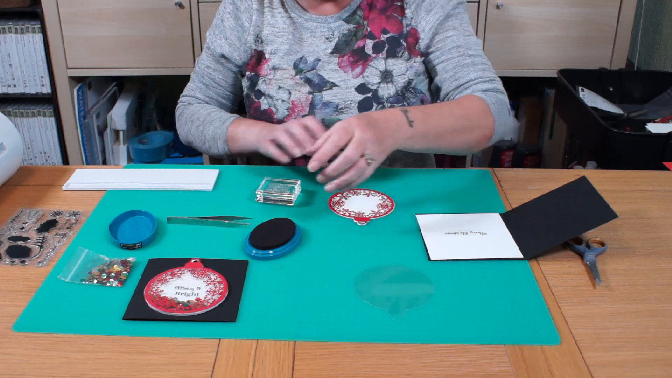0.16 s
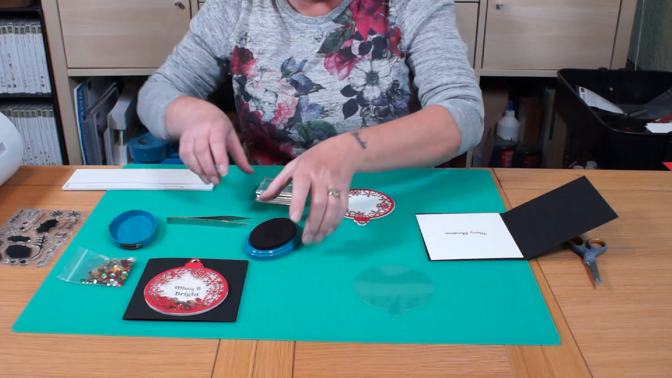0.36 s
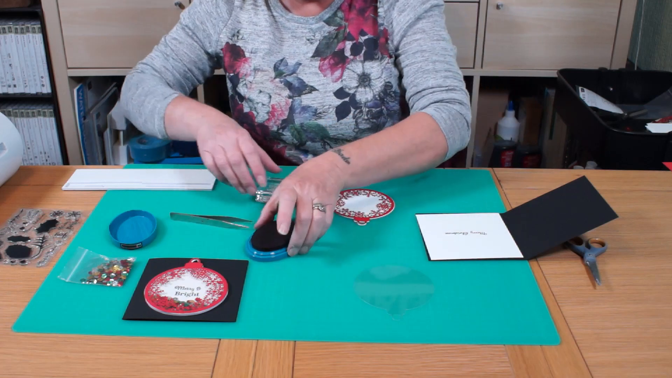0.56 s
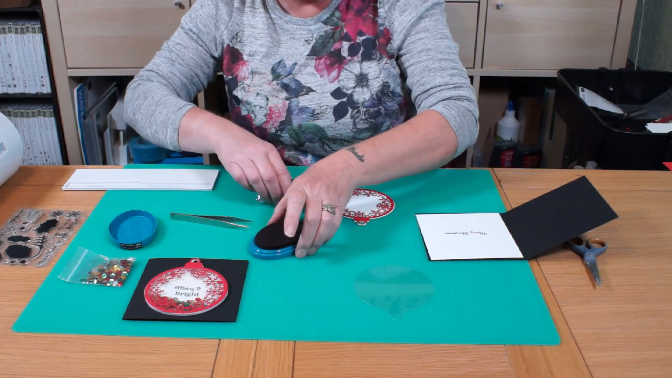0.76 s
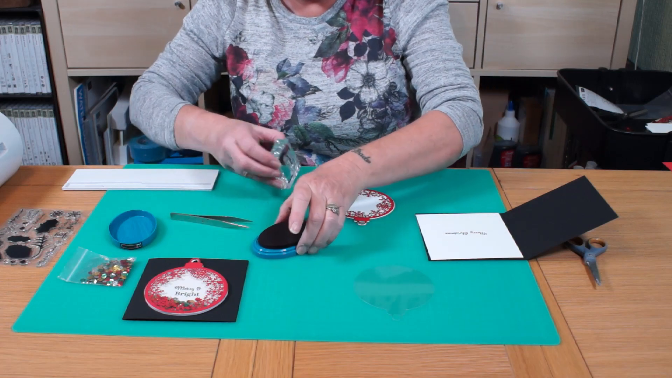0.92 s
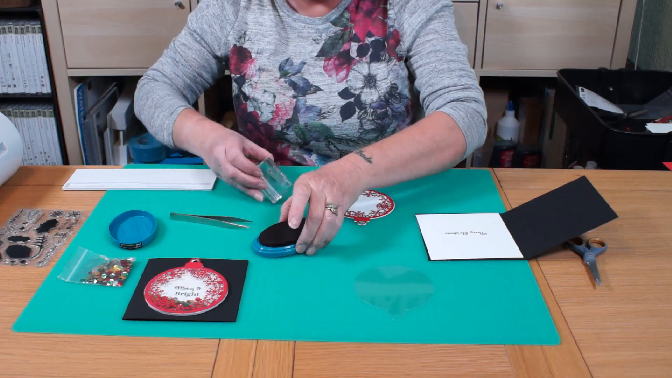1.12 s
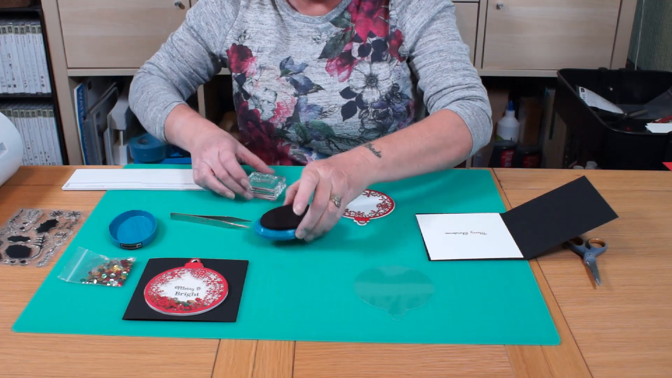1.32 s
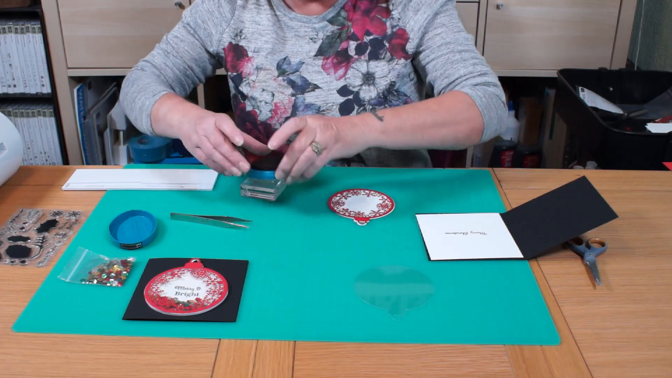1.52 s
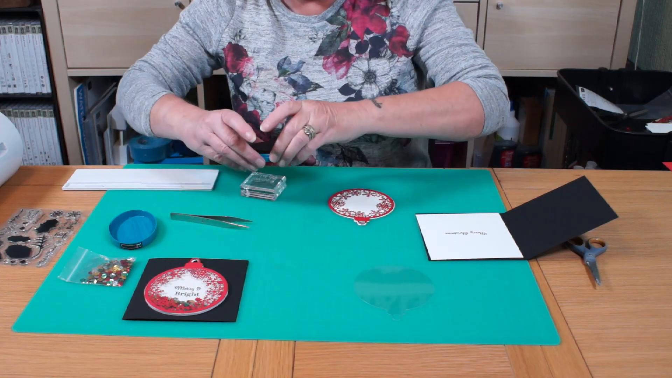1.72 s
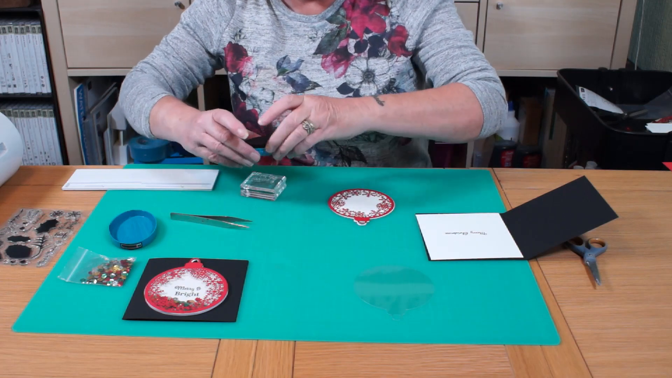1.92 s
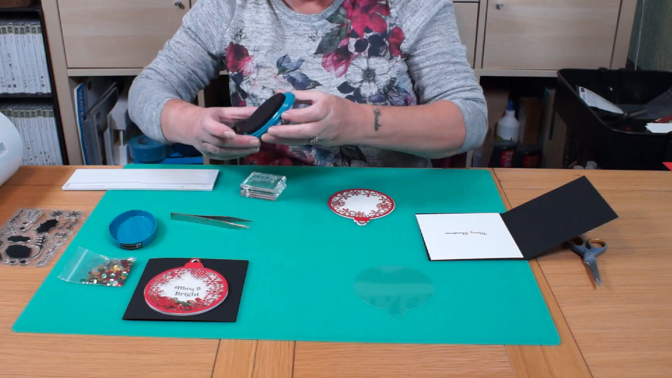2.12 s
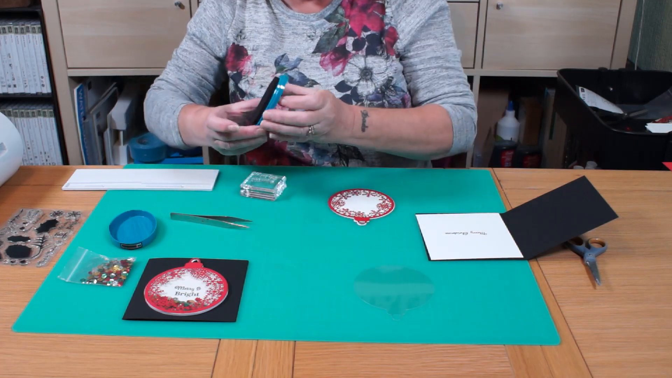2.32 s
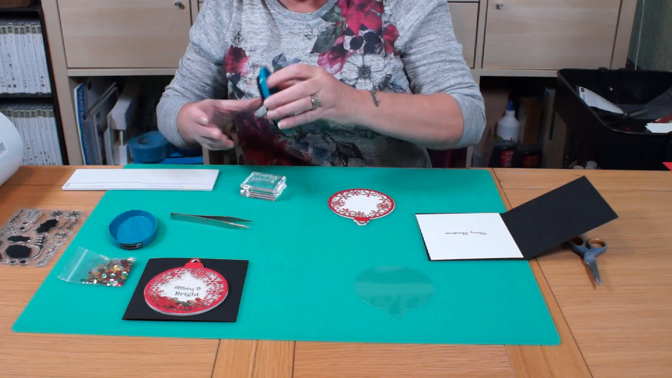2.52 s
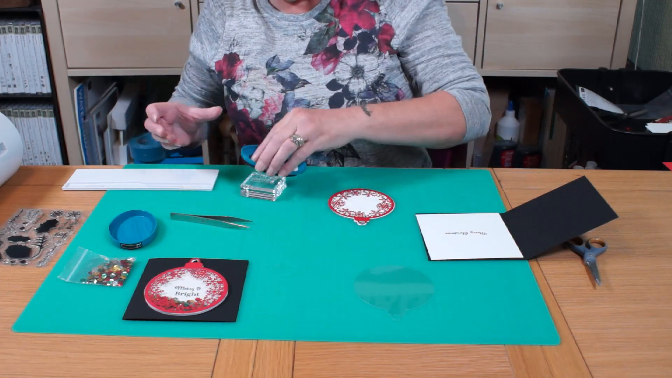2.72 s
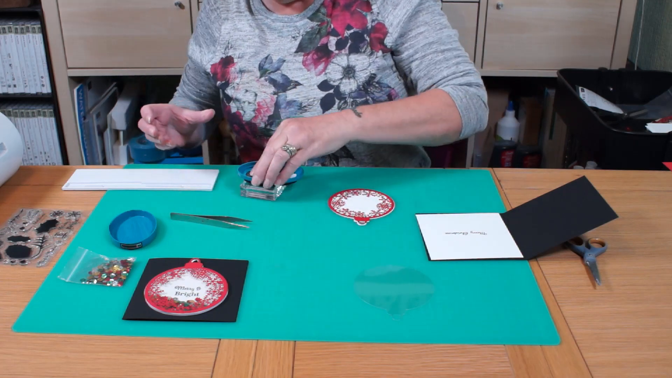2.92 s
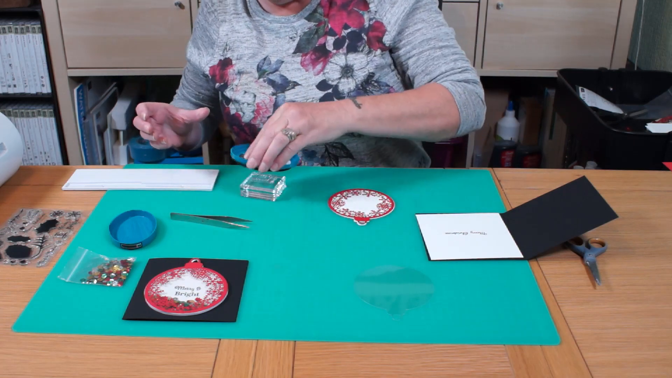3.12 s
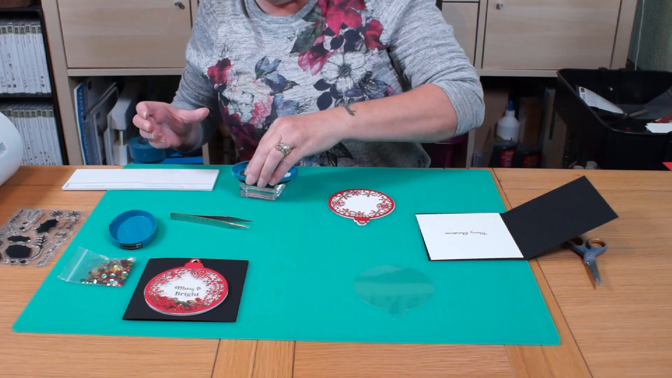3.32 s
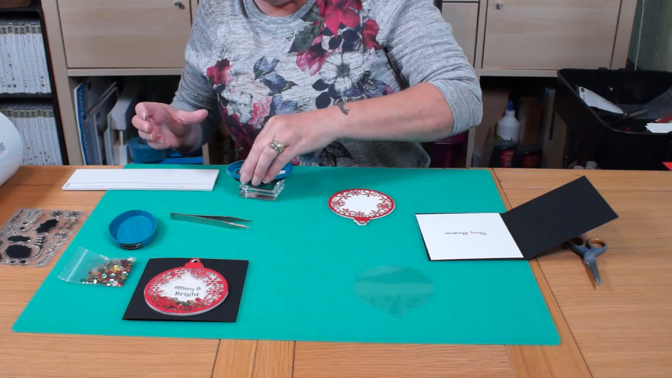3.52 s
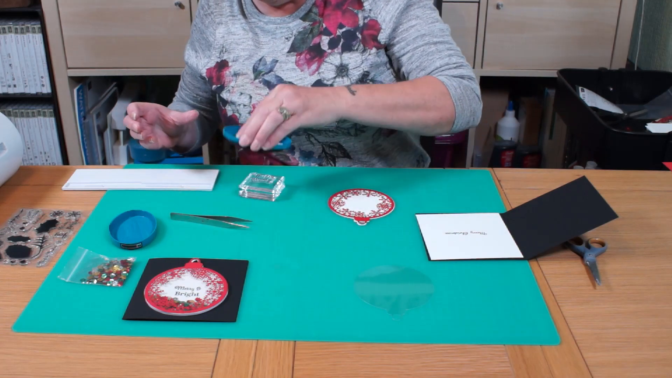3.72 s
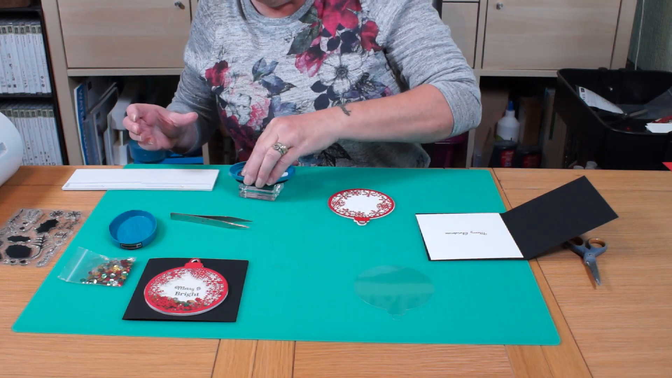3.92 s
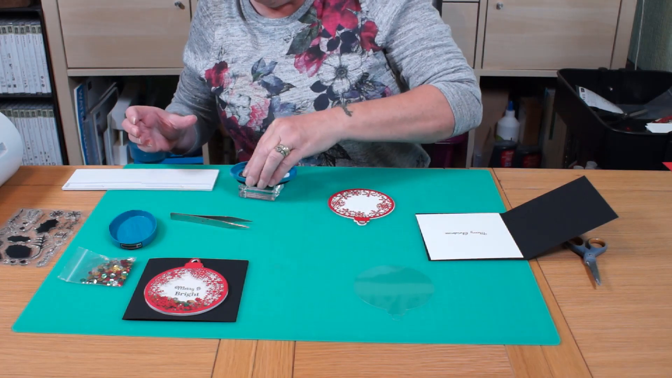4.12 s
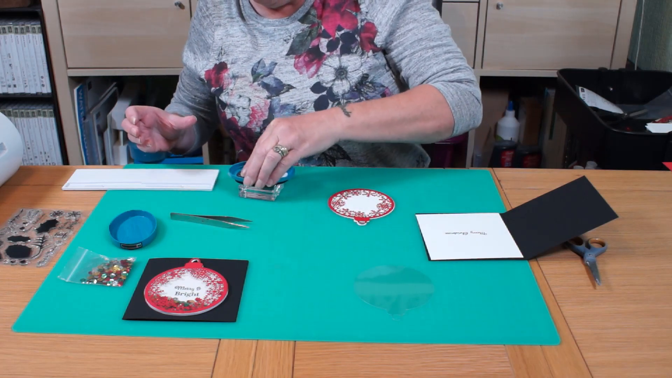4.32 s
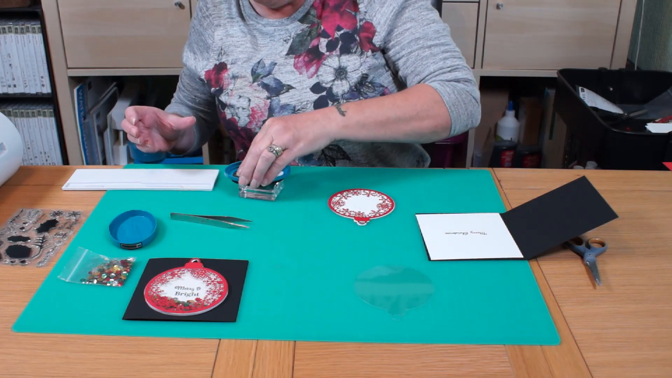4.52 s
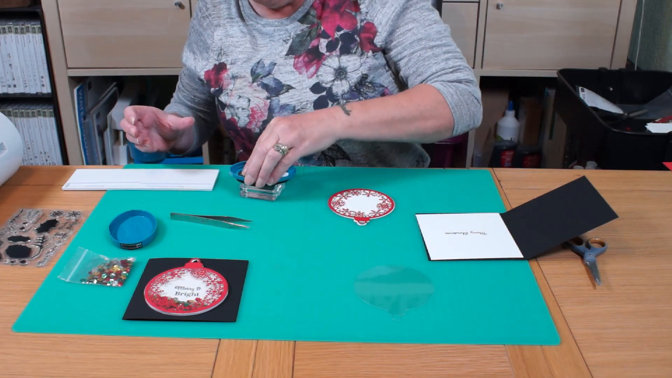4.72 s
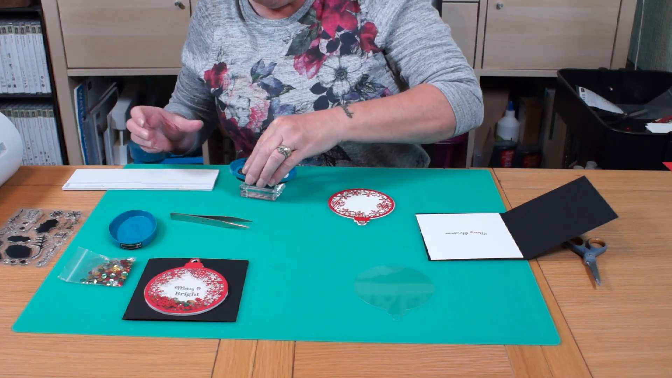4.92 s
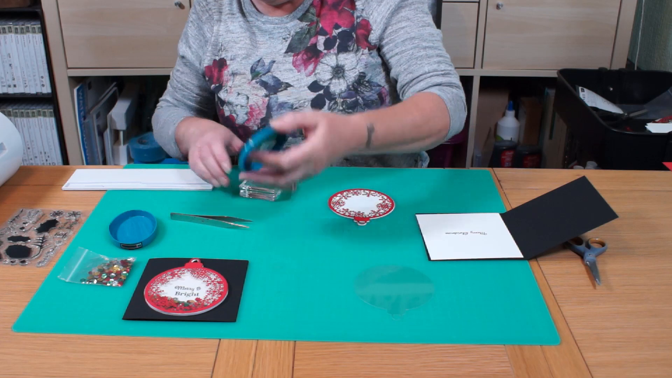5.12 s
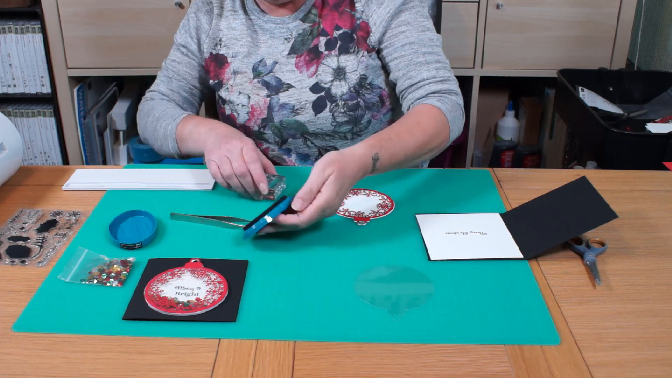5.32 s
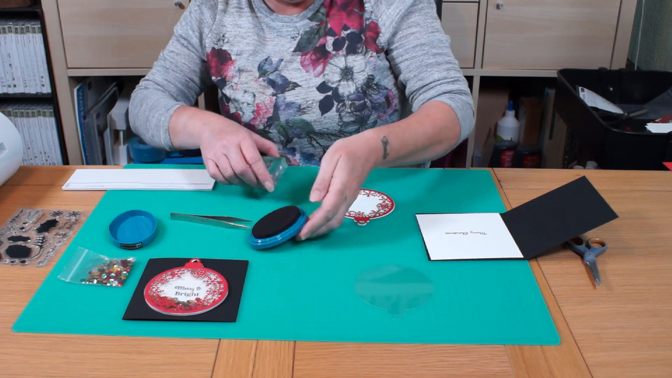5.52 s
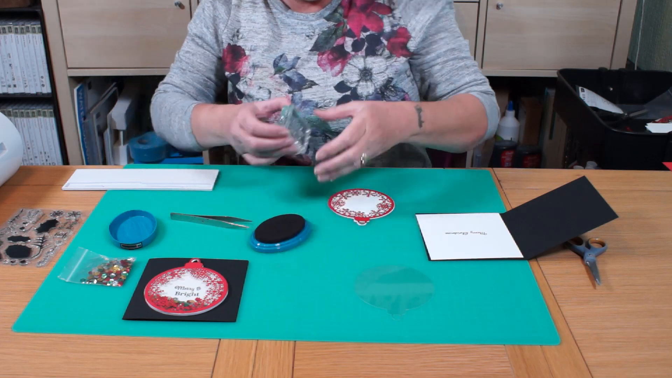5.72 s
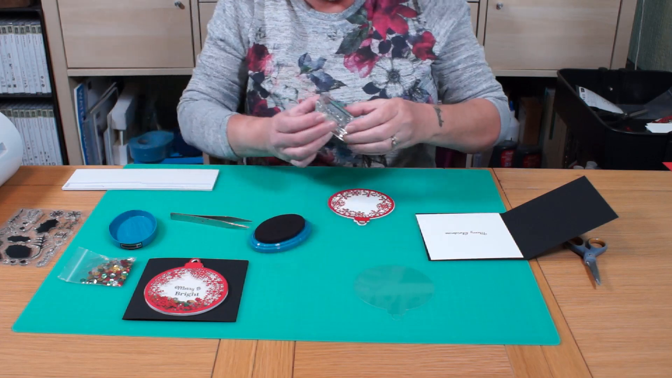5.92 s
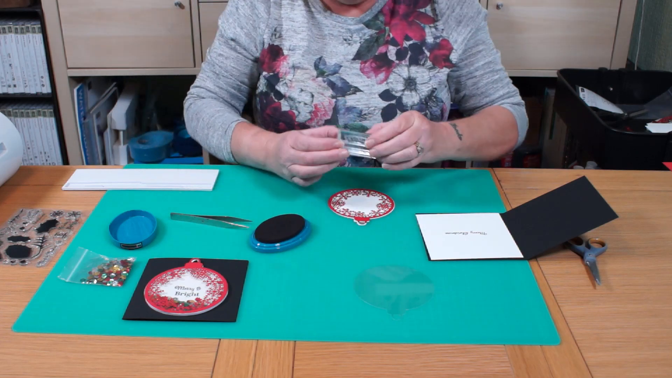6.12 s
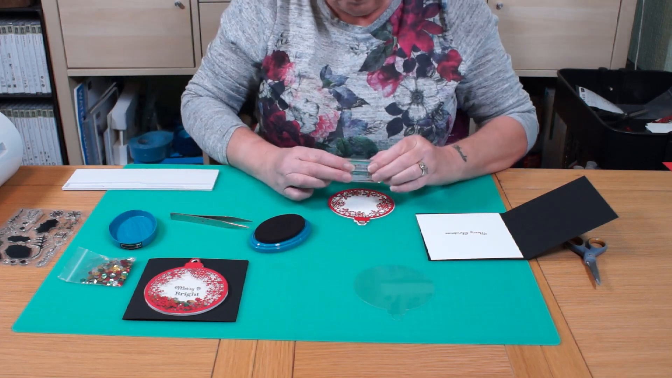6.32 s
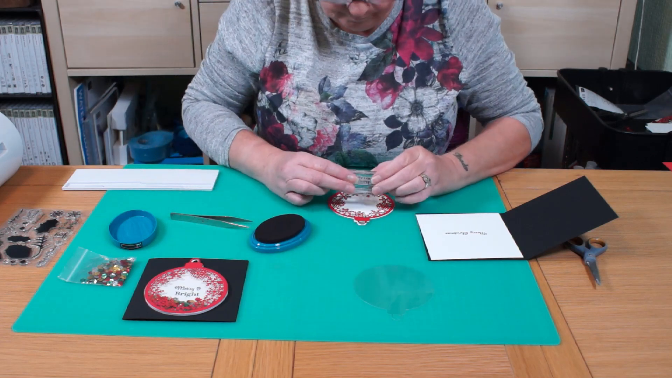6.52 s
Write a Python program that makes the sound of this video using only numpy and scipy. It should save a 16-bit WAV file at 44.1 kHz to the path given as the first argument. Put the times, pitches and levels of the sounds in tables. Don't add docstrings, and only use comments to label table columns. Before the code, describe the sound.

A small, fairly dry room with soft wide hiss and a barely audible appliance hum. Tiny scuffs brush the mat at the start. Around 0.56 s a slight touch leads into a sharp plastic clack at 0.65, then a weak bump at 0.77 and scuffing. Firm knocks land at 1.14 and 1.33, with a lighter bounce between, ringing briefly through the wooden table. Near quiet follows, with very faint rubs around 2.2-2.5. Felt-softened taps begin dull at 2.9, stronger at 3.28, soft at 3.52 and 3.92, strong at 4.16, then continue about every 0.2 s at 4.34, 4.54, 4.76 and 4.92, each a short woody thud with a faint lift-off. Scuffs and two bright clacks come at 5.33-5.47, then a hollow plastic rocking clatter at 5.68-5.74. A faint low thump at about 5.98 and a slight brush leave only hiss until 6.5.

```python
import sys
import numpy as np
from scipy import signal
from scipy.io import wavfile
from scipy.ndimage import uniform_filter1d

SR = 44100
rng = np.random.default_rng(int(sys.argv[2]) if len(sys.argv) > 2 else 0)


def convert_level_to_amplitude(level_db):
    exponent = np.asarray(level_db, float) / 20
    return 10 ** exponent


def store_pcm(level_fs):
    pcm = np.round(np.clip(level_fs, -1, 1) * 32767).astype(np.int16)
    wavfile.write(sys.argv[1], SR, np.atleast_2d(pcm).T)


N = 289188

# frequency in Hz, density in dB per Hz.
HISS_COLOUR = [(15, -51), (25, -32), (77, -8), (254, -0.5), (1140, -2.5), (6440, -14.5), (11000, -20),
               (14300, -104)]
# frequency in Hz, left-right likeness from -1 to 1.
HISS_LIKENESS = [(60, 1), (130, 0.56), (270, -0.083), (560, -0.68), (1180, -0.54), (2490, -0.29),
                 (5250, 0.0057), (11100, 0.26)]
# time in seconds, level in dB.
HISS_DRIFT = [(0.0, -60.5), (2.6, -63), (3.4, -62), (6.56, -61)]
# centre in Hz, width in Hz, boost in dB.
AIR_BOOMS = [(97.8, 11.4, 6), (250, 45, 2), (600, 140, 3), (850, 30, 3)]
# frequency in Hz, level in dB.
APPLIANCE_HUMS = [(99, -77.5), (880, -79)]
# start in seconds, level in dB, centre in Hz,
# width in Hz, length in seconds.
SCUFFS = [(0.008, -53, 865, 2320, 0.032), (0.603, -51, 1750, 2570, 0.068), (0.783, -61, 1810, 2500, 0.046),
          (0.868, -55.5, 1030, 2400, 0.049), (2.231, -69, 1500, 2000, 0.047),
          (2.462, -71, 2500, 4000, 0.045), (2.993, -68, 3800, 6000, 0.063), (5.326, -58, 2040, 2920, 0.048),
          (5.382, -58.5, 1350, 900, 0.033), (5.607, -59, 1970, 200, 0.051), (5.644, -54, 1900, 300, 0.022),
          (5.64, -60, 3530, 1200, 0.035), (0.017, -56, 445, 293, 0.023), (0.886, -57.5, 600, 900, 0.041),
          (6.014, -67.5, 3340, 3920, 0.059)]
# start in seconds, blow in dB, table thud in dB re blow, body pitch in Hz,
# edge tick in dB re blow.
KNOCKS = [(0.561, -50.5, 12.5, 2000, 14), (0.646, -11.5, -45, 1820, -3.5), (0.765, -41.5, 2.5, 990, 2),
          (1.1408, -13.5, -4, 1075, -5), (1.184, -29, -3, 1220, 4.5), (1.334, -15.5, -5.5, 1830, -7),
          (5.4169, -14, -5.5, 1770, 7), (5.467, -20.5, -7, 1600, 7), (5.68, -20.5, -11.5, 1430, 1),
          (5.719, -28.5, -35, 1210, 4.5), (5.735, -28.5, -8, 1240, -2)]
# start in seconds, level in dB, pitch in Hz, 60 dB decay in seconds.
KNOCK_RINGS = [(0.648, -39.5, 392, 0.16), (0.648, -47, 4130, 0.12), (1.144, -33.5, 515, 0.13),
               (1.143, -31, 1220, 0.069), (1.143, -25, 2260, 0.014), (1.336, -39, 2290, 0.04),
               (1.336, -42, 1880, 0.051), (0.648, -38, 794, 0.069), (0.649, -37.5, 1140, 0.08),
               (5.47, -29.5, 1447, 0.06), (5.418, -29, 2700, 0.028), (5.418, -27, 1604, 0.046),
               (5.417, -35, 480, 0.045), (5.418, -23, 587, 0.036)]
# start in seconds, level in dB.
CASE_ROCKS = [
    (5.682, -23.5),
    (5.72, -30),
    (5.738, -28.5),
]
# start in seconds, blow in dB, table thud in dB re blow, edge tick in dB re
# blow, later table swell in dB re table thud.
TAPS = [
    (2.905, -25.5, -2, -40, -16.5),
    (3.277, -16.5, -3.5, -7.5, -16),
    (3.516, -26.5, 4, -4.5, -15.5),
    (3.919, -26, 1.5, -3, -12.5),
    (4.16, -16.5, 0, -7, -15),
    (4.344, -22.5, -1.5, -13.5, -19.5),
    (4.538, -29.5, 5.5, -3.5, -16.5),
    (4.755, -20, -0.5, -7, -17),
    (4.9164, -23, -1.5, -13.5, -19),
]
# frequency in Hz, level in dB, 60 dB decay in seconds.
CASE_MODES = [(870, -0.5, 0.086), (995, 2.5, 0.069), (1155, 5.5, 0.078), (1289, 4, 0.11), (1570, -2, 0.05),
              (1830, -5, 0.06), (2000, -5, 0.068), (2253, 5.5, 0.043), (2440, -2, 0.06),
              (2630, -1.5, 0.056)]
# frequency in Hz, level in dB, 60 dB decay in seconds.
FRAME_MODES = [(102.4, -12, 0.29), (133, -8.5, 0.17), (161, -4, 0.16), (179.2, -7, 0.29)]
# frequency in Hz, level in dB, 60 dB decay in seconds.
TOP_MODES = [(200, -9, 0.3), (224.1, -1, 0.23), (261.7, -8, 0.33), (305.7, 9, 0.11), (339.6, 6.5, 0.18),
             (364, -8, 0.34), (441.4, 0, 0.16), (480, 0, 0.17), (526.7, -1, 0.16), (564.6, -1.5, 0.16),
             (610, -0.5, 0.09), (703.6, -16.5, 0.35), (750, -25.5, 0.4)]
# frequency in Hz, level in dB, 60 dB decay in seconds.
LATER_SWELL_MODES = [(235, -8, 0.14), (296, 3, 0.22), (342, -5.5, 0.11)]
# frequency in Hz, level in dB, 60 dB decay in seconds.
STANDING_WAVES = [(689, 1, 0.18), (818, 3, 0.2), (971.5, 0.5, 0.21), (1128, 6, 0.12), (1212, -1, 0.23),
                  (1264, 3, 0.15), (1428, -5, 0.26), (1700, 3, 0.25), (1747, -6.5, 0.29), (1855, 10, 0.085),
                  (2066, 8.5, 0.14), (2460, 8.5, 0.12)]
# frequency in Hz, 60 dB decay in seconds.
ROOM_DECAY = [(100, 0.81), (300, 0.39), (1000, 0.22), (3000, 0.21), (10000, 0.17)]
# frequency in Hz, left-right likeness.
ROOM_LIKENESS = [(100, 0.57), (300, 0.49), (1000, 0.56), (3000, 0.22), (10000, 0.087)]
# delay in seconds, level in dB.
ECHOES = [(0.0011, -0.5), (0.0033, -8.5), (0.0059, -4), (0.0085, -10)]


def evened(x):
    return x / np.sqrt(np.mean(x ** 2) + 1e-20)


def read(points, hz):
    f, value = np.transpose(points)
    return np.interp(np.log(hz + 1), np.log(f + 1), value)


def add(mix, start_s, sound):
    part = mix[..., round(start_s * SR):][..., :sound.shape[-1]]
    part += sound[..., :part.shape[-1]]


def highpass(x, hz):
    return signal.lfilter(*signal.butter(2, hz / SR * 2, "high"), x)


def pair_noise(frames, size, same, db):
    a, b, c, d = rng.standard_normal((frames, size // 2 + 1, 4)).T
    same = np.clip(same, -1, 1)[:, None]
    left = a + 1j * b
    right = same * left + np.sqrt(1 - same ** 2) * (c + 1j * d)
    spectra = np.array([left, right]) * convert_level_to_amplitude(db)
    return signal.istft(spectra, nperseg=size, noverlap=3 * size // 4)[1]


def ring(modes, t, turn=0., node_hz=SR):
    out = np.zeros(len(t))
    for k, (hz, db, t60) in enumerate(modes):
        decay = convert_level_to_amplitude(db - 60 * t / t60)
        out += np.sign(node_hz - hz) * decay * np.sin(2 * np.pi * hz * t + turn * k)
    return out / abs(out).max()


def room(wet_db, hollow_db):
    hz = np.fft.rfftfreq(256, 1 / SR)
    frame_s = np.arange(330) * 64 / SR
    tail = pair_noise(330, 256, read(ROOM_LIKENESS, hz), -60 * frame_s / read(ROOM_DECAY, hz)[:, None])
    t = np.arange(tail.shape[1]) / SR
    tail = tail * np.clip(t / 0.0042, 0, 1)
    waves = ring(STANDING_WAVES, t)
    out = convert_level_to_amplitude(wet_db) * tail / np.linalg.norm(tail[0])
    out = out + convert_level_to_amplitude(hollow_db) * waves / np.linalg.norm(waves)
    out[:, 0] += 1
    for delay_s, db in ECHOES:
        out[:, round(delay_s * SR * rng.uniform(.92, 1.08))] += convert_level_to_amplitude(db) * rng.choice([-1, 1])
    return out


def stir(t):
    wash_db, t60_s, rise_s = -47, 4.2, 0.067
    power = 0
    for start_s, db, *_ in KNOCKS + TAPS:
        age = np.maximum(t - start_s, 0)
        swell = np.clip(age / rise_s, 0, 1)
        power = power + (convert_level_to_amplitude(db + wash_db - 60 * age / t60_s) * swell) ** 2
    return power


def hiss():
    frames = N // 512 + 5
    hz, t = np.fft.rfftfreq(2048, 1 / SR), np.arange(N) / SR
    patches = rng.standard_normal((frames, 1025)).T
    patches = evened(uniform_filter1d(uniform_filter1d(patches, 24, 0), 7, 1))
    colour = read(HISS_COLOUR, hz)
    for centre_hz, width_hz, db in AIR_BOOMS:
        colour = colour + db * np.exp(-((hz - centre_hz) / width_hz) ** 2)
    noise = pair_noise(frames, 2048, read(HISS_LIKENESS, hz), colour[:, None] + 0.95 * patches)[:, :N]
    waver = evened(uniform_filter1d(rng.standard_normal(N), 4000))
    hum = np.zeros(N)
    for hum_hz, db in APPLIANCE_HUMS:
        hum += convert_level_to_amplitude(db + 1.4 * waver) * np.sqrt(2) * np.sin(2 * np.pi * hum_hz * t + waver)
    coarse_t = t[::64]
    drift = convert_level_to_amplitude(np.interp(coarse_t, *np.transpose(HISS_DRIFT)))
    level = np.sqrt(drift ** 2 + stir(coarse_t))
    return evened(noise) * convert_level_to_amplitude(5.5) * np.repeat(level, 64)[:N] + hum


def scuffs():
    air = np.zeros(N)
    for start_s, db, hz, width_hz, length_s in SCUFFS:
        length = round(length_s * SR)
        grit = rng.standard_normal(6000) * convert_level_to_amplitude(0.94 * rng.exponential(1, 6000))
        edges = hz * np.exp(np.array([-1, 1]) * np.arcsinh(width_hz / hz / 2))
        rub = signal.lfilter(*signal.butter(2, np.clip(edges / SR * 2, .002, .9), "band"), grit)
        add(air, start_s, convert_level_to_amplitude(db) * evened(rub)[:length] * np.hanning(length))
    return convert_level_to_amplitude(2.0) * signal.fftconvolve(air[None], room(3.8, -12.0), axes=1)[:, :N]


def blow(db, hz, cycles, tick_db, tick_hz, tick_cycles):
    t = np.arange(900) / SR
    age = t * hz / cycles
    body = np.sin(2 * np.pi * hz * t) * age * np.exp(1 - age)
    tick = np.sin(2 * np.pi * tick_hz * t) * np.exp(-t * tick_hz / tick_cycles)
    return convert_level_to_amplitude(db - 5.5) * highpass(body, 300) + convert_level_to_amplitude(db + tick_db - 1.5) * highpass(tick, 1500)


def thud(db, push_s, frame_db=0.):
    t = np.arange(SR // 2) / SR
    push = np.hanning(max(round(push_s * SR), 3))
    stirred = [(hz, mode_db + 1.7 * rng.standard_normal(), t60) for hz, mode_db, t60 in TOP_MODES]
    top = np.array([ring(stirred, t, turn=turn, node_hz=320) for turn in (1.138, 1.227)])
    frame_level = convert_level_to_amplitude(np.array([[-14.5], [-18.5]]) + frame_db + 1.7 * rng.standard_normal())
    frame = frame_level * ring(FRAME_MODES, t, turn=3.14)
    swell = (top + frame) * (1 - np.exp(-t / 0.0023))
    return convert_level_to_amplitude(db + np.array([[-.8], [.8]])) * signal.fftconvolve(swell, push[None] / push.sum())


def knocks():
    out, air, t = np.zeros((2, N)), np.zeros(N), np.arange(SR // 4) / SR
    for start_s, db, thud_db, hz, tick_db in KNOCKS:
        hit = blow(db, hz, 0.34, tick_db, 2690, 0.48)
        sound = signal.fftconvolve(hit[None], room(14.3, 0.072), axes=1)
        add(out, start_s + 0.00065, convert_level_to_amplitude(0.5) * sound)
        add(out, start_s, thud(db + thud_db, 0.00057, frame_db=-1.0))
    for start_s, db, hz, t60 in KNOCK_RINGS:
        add(air, start_s, convert_level_to_amplitude(db) * ring([(hz, 0, t60)], t))
    for start_s, db in CASE_ROCKS:
        add(air, start_s, convert_level_to_amplitude(db) * ring(CASE_MODES, t, turn=2.55))
    out = out + signal.fftconvolve(air[None], room(1.8, -10.0), axes=1)[:, :N]
    return highpass(out, 70)


def taps():
    base_hz, hz_per_db = 1172, 5.5
    shake_db, swell_lag_s = -46, 0.108
    out, t = np.zeros((2, N)), np.arange(SR // 2) / SR
    spot = room(18.0, 0.87)
    shake = ring([(38.3, -0.96, 0.38), (63.4, -0.54, 0.52)], t) * np.clip(t / 0.01, 0, 1)
    later_swell = ring(LATER_SWELL_MODES, t) * np.clip(t / 0.0037, 0, 1)
    for start_s, db, thud_db, tick_db, later_swell_db in TAPS:
        hz = base_hz + hz_per_db * (db + tick_db + 37)
        soft = np.convolve(blow(db, hz, 0.3, tick_db, 1650, 1.0), np.hanning(7) / 3)
        sound = signal.fftconvolve(soft[None], spot + 0.66 * room(20.6, -4.0), axes=1)
        add(out, start_s + 0.00148, convert_level_to_amplitude(-7.0) * sound)
        add(out, start_s, thud(db + thud_db + 1, 0.00088))
        add(out, start_s, convert_level_to_amplitude(shake_db) * shake * convert_level_to_amplitude([[-1.5], [1.5]]))
        add(out, start_s + swell_lag_s, convert_level_to_amplitude(db + thud_db + later_swell_db - 4.5) * later_swell)
    add(out, 5.979, thud(-40, 0.0045))
    return out


def scene():
    return hiss() + scuffs() + knocks() + taps()


def low_pass(x):
    return signal.sosfilt(signal.butter(12, 11670, fs=SR, output="sos"), x)


def record(dry):
    edge = signal.firwin(301, 11250, window=("kaiser", 5), fs=SR)
    mix = signal.oaconvolve(dry, edge[None], "same")
    return low_pass(mix)


dry = scene()
out = record(dry)
store_pcm(out)
```